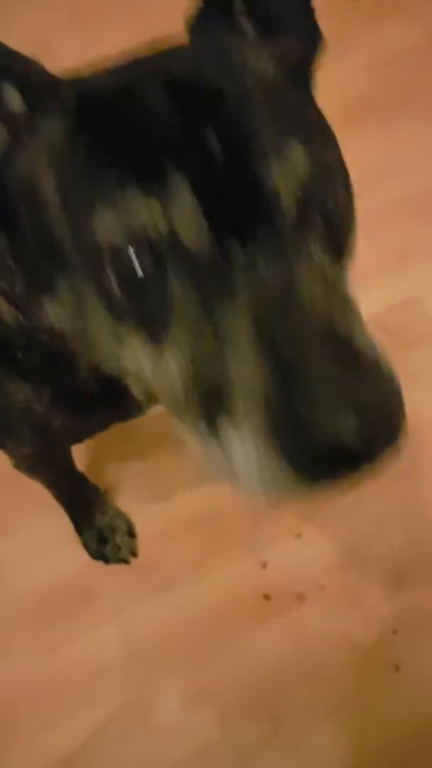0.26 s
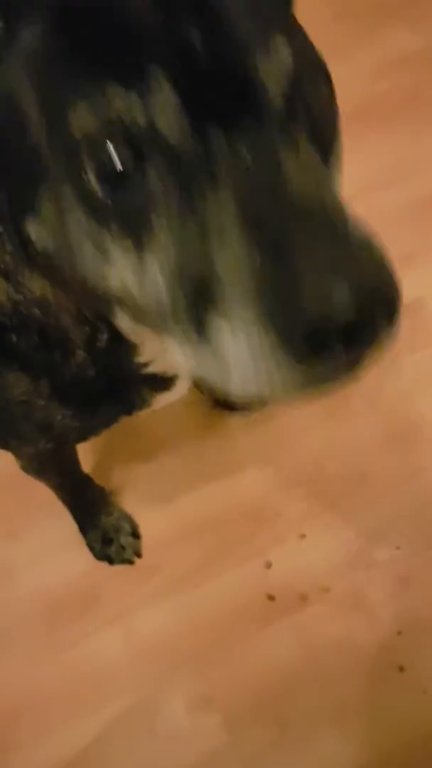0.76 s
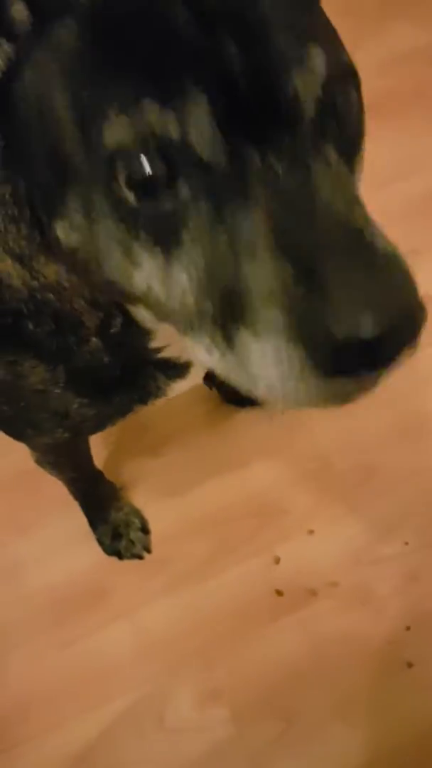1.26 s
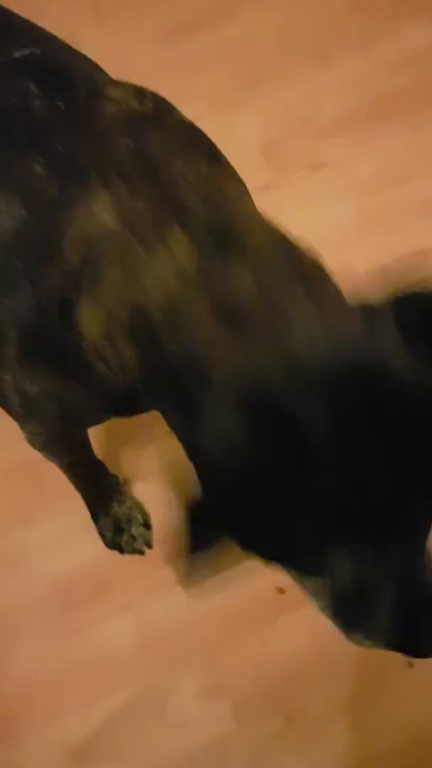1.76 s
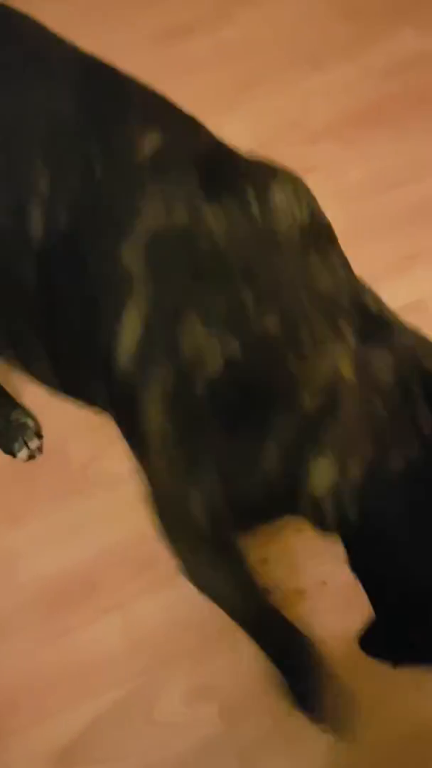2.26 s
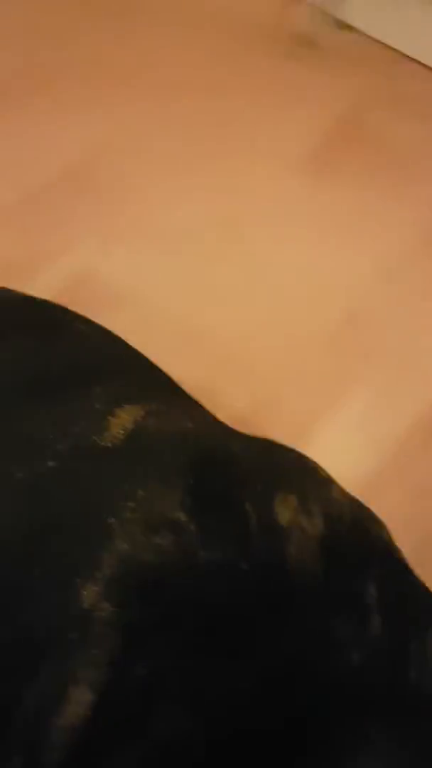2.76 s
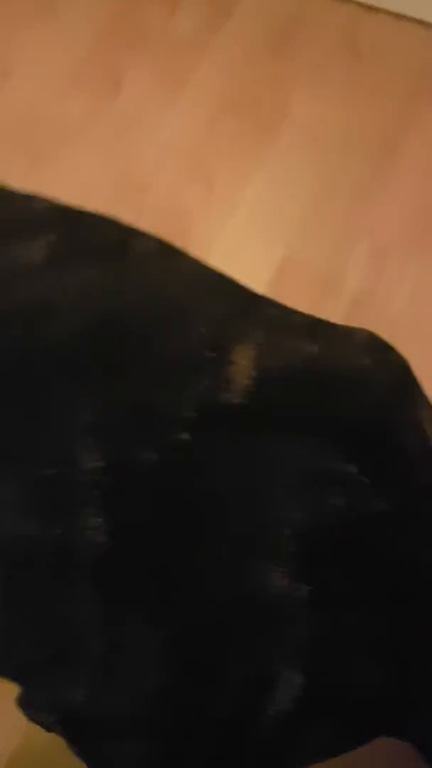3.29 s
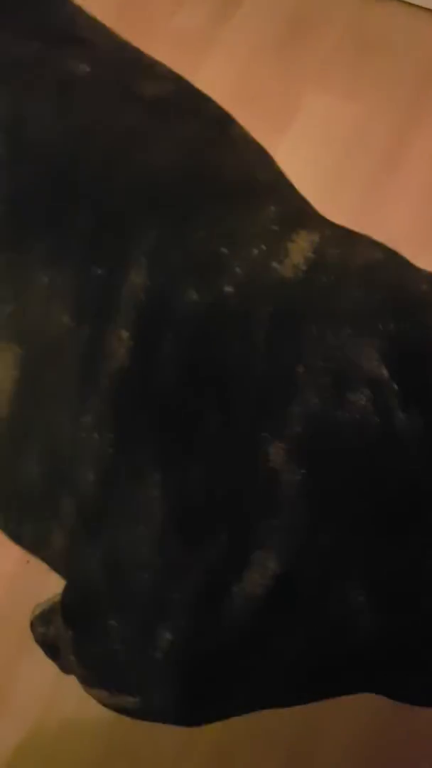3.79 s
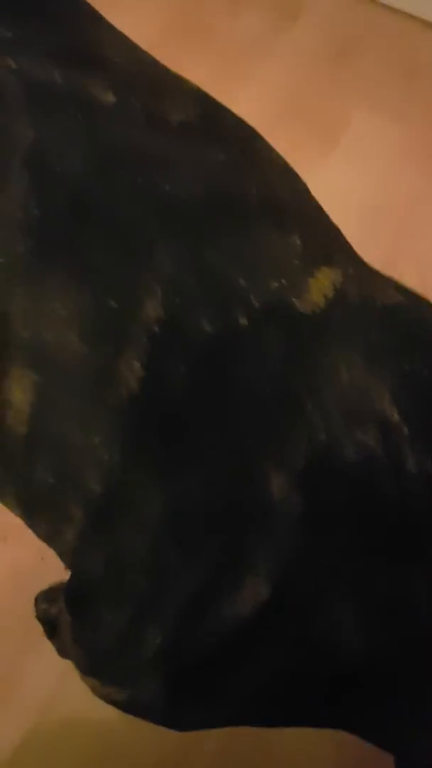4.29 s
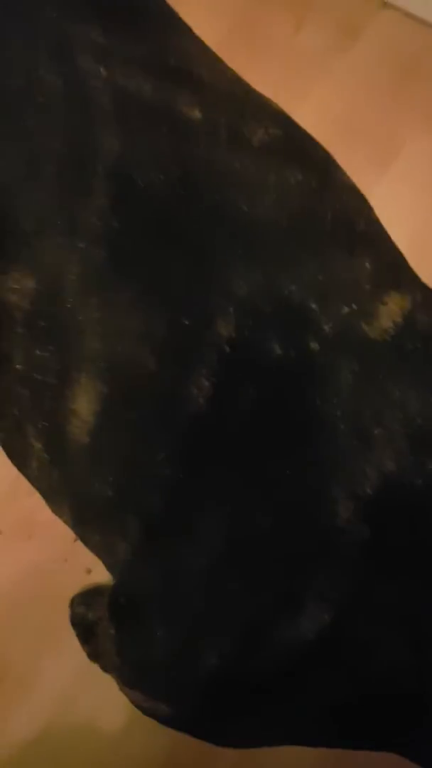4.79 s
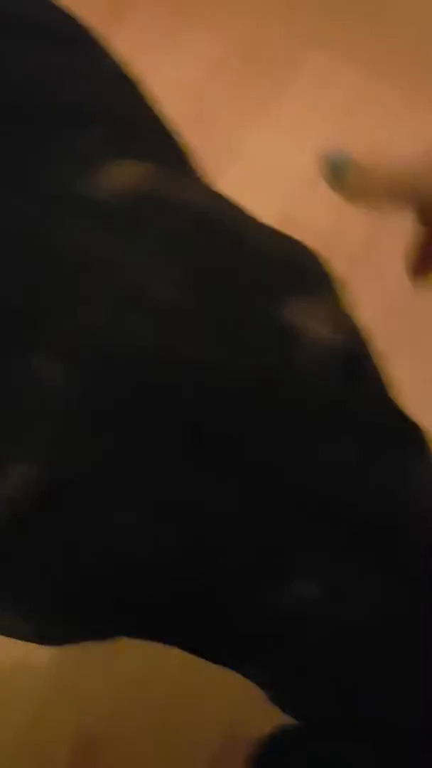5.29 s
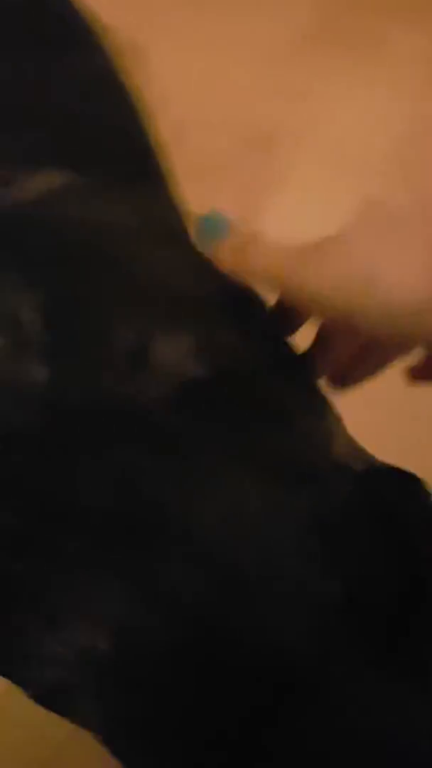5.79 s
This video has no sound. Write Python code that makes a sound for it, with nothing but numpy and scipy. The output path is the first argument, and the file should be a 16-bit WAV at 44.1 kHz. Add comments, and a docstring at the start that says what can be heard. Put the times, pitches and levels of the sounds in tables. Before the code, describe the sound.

Near silence with slight room hiss, then a dog grabs a hard biscuit: a hollow knock, followed by an explosive, bright crack. It keeps chewing with its head down, giving quieter dull knocks, small crunches and grinding, with paws shuffling on wooden boards. The sounds come in uneven bursts, with lively room echo, recorded close in stereo.

```python
"""In a bare room with a wooden floor a dog snaps up a hard biscuit, cracks it and chews while it shifts its paws.
Hollow knocks of jaw and boards are short decaying sines, ticks of tooth and claw higher ones, cracks are
showers of spiky noise through resonances, and the sharpest breaks are single pressure spikes; all ring in the room.
Shuffling and crumb rustle are uneven resonant grains over a faint hum and hiss of filtered noise;
two microphone ports hear the dog a little apart."""
import sys
import numpy as np
from scipy import signal
from scipy.fft import rfft, irfft, next_fast_len
from scipy.io import wavfile

SR = 44100
rng = np.random.default_rng(int(sys.argv[2]) if len(sys.argv) > 2 else 0)


def gain_from_db(level_db):
    """Turn a decibel level (scalar or array-like) into a linear amplitude factor."""
    decades = np.asarray(level_db, float) / 20
    return 10 ** decades


def unload_wav(signal):
    """Save mono or channel-first audio to the path in sys.argv[1] as 16-bit WAV at rate SR, clipped to [-1, 1]."""
    wavfile.write(
        sys.argv[1],
        SR,
        np.round(np.clip(np.atleast_2d(signal).T, -1, 1) * 32767).astype(np.int16),
    )


N = 266805

# slow shuffling and grinding, before layer gains: start_s, drag_db, rustle_db
GRINDING = [(1.499, -72, -88), (1.83, -78, -74), (2.0, -46, -58), (2.301, -53, -62), (2.49, -61.5, -64.5),
            (2.55, -61, -51.5), (2.69, -65.5, -66.5), (2.85, -58.5, -66), (2.999, -70, -74),
            (3.05, -63, -55), (3.12, -66, -65), (3.209, -54, -57.5), (3.45, -73, -82), (3.72, -74.5, -68),
            (3.86, -65.5, -74), (4.1, -68.5, -75), (4.36, -47, -50), (4.55, -54, -59), (4.76, -59, -64.5),
            (5.07, -70.5, -73), (5.25, -55, -62), (5.4, -62.5, -63), (6.05, -63, -68.5)]


def unit(x):
    """Scaled to rms 1."""
    return x / np.sqrt(np.mean(x ** 2) + 1e-20)


def along(points, hz):
    """(Hz, value) points interpolated on a log frequency axis."""
    point_hz, value = np.transpose(points)
    return np.interp(np.log(hz + 1), np.log(point_hz + 1), value)


def filtered(x, response):
    """x times a complex response of frequency."""
    size = next_fast_len(x.shape[-1] + 8192)
    spectrum = rfft(x, size) * response(np.fft.rfftfreq(size, 1 / SR))
    return irfft(spectrum, size)[..., :x.shape[-1]]


def resonant(x, modes):
    """x through causal resonances of alternating sign, applied twice for steep flanks."""
    def bank(f):
        total = 0
        for k, (center_hz, width_hz, gain_db) in enumerate(modes):
            band = 1j * f * width_hz / (center_hz ** 2 - f * f + 1j * f * width_hz)
            total = total + gain_from_db(gain_db / 2) * band * (-1) ** k
        return total
    return filtered(x, lambda f: bank(f) ** 2)


def diffuse(pair):
    """Two unrelated signals mixed so that the ports agree most in the bass."""
    # diffuse sound at the two ports: freq_hz, left_right_correlation
    likeness = [(60, 0.48), (180, 0.87), (550, 0.44), (1650, -0.27), (4970, 0.11), (15000, -0.27)]

    def rotation(hz):
        angle = np.arccos(np.clip(along(likeness, hz), -1, 1)) / 2
        return np.array([np.cos(angle), np.sin(angle)])
    mid, side = filtered(pair, rotation)
    return np.array([mid + side, mid - side])


def curves(rows):
    """One value per sample for each column after the time; -120 before the first row."""
    s, *columns = np.transpose(rows)
    return [np.interp(np.arange(N) / SR, s, column, left=-120) for column in columns]


def turned(s):
    """Room over direct sound, dB, as the head turns and drops away from the microphone."""
    # head position, before layer gains: time_s, room_over_direct_db
    head = [(0, -14), (1.7, -9.5), (1.84, 0.5), (1.98, 1.5), (2.15, 3), (2.7, 3.5), (3.2, -3.5), (3.4, -11),
            (3.78, -2), (4.0, -12.5), (4.25, 0.3), (4.55, 1.5), (5.1, -4), (5.4, -1.5), (5.75, -0.5),
            (5.9, -10)]
    return np.interp(s, *np.transpose(head))


def knocks():
    """Each blow rings a short hollow mode, a weaker upper one and the boards; returns direct sound and room feed."""
    # hollow blows of jaw, paw and boards, before layer gain: start_s, level_db, pitch_hz, t60_s
    blows = [(0.918, -55.5, 814, 0.029), (1.205, -41, 680, 0.027), (1.206, -46, 299, 0.042),
             (1.61, -29, 650, 0.0097), (1.635, -45, 693, 0.049), (1.659, -9.5, 329, 0.01),
             (1.663, -8, 604, 0.015), (1.683, -30.5, 490, .03), (1.706, -33, 357, 0.025),
             (1.723, -28, 294, 0.015), (1.835, -13.5, 756, 0.017), (1.84, -23, 487, 0.035),
             (1.871, -33, 665, 0.046), (1.885, -29.5, 654, 0.016), (1.957, -27, 644, 0.024),
             (1.979, -31, 652, 0.018), (2.047, -34.5, 749, 0.044), (2.052, -35, 592, 0.049),
             (2.119, -39.5, 636, 0.053), (2.277, -41.5, 644, 0.035), (2.314, -49.5, 662, 0.043),
             (2.591, -48.5, 290, 0.078), (2.705, -24.5, 677, 0.0078), (2.722, -35.5, 203, 0.033),
             (2.764, -35, 188, 0.076), (2.767, -40, 640, 0.023), (2.792, -46, 199, 0.041),
             (2.884, -56, 512, 0.037), (3.058, -55.5, 296, 0.076), (3.177, -28.5, 605, 0.022),
             (3.192, -42, 690, 0.02), (3.225, -47.5, 513, .047), (3.295, -41, 568, 0.19),
             (3.314, -35, 574, 0.072), (3.384, -41, 1000, 0.024), (3.602, -56, 810, 0.027),
             (3.622, -50.5, 942, 0.021), (3.698, -41.5, 815, .018), (3.713, -44, 486, 0.026),
             (3.743, -37.5, 590, 0.015), (3.763, -38, 576, .037), (3.776, -23.5, 549, 0.03),
             (3.79, -38, 525, 0.065), (3.804, -36, 669, 0.025), (3.861, -34, 570, 0.022),
             (4.045, -53.5, 460, 0.038), (4.13, -46, 940, .025), (4.211, -45.5, 770, 0.039),
             (4.23, -33, 517, 0.017), (4.264, -34, 810, 0.017), (4.282, -32, 880, 0.014),
             (4.356, -45, 550, 0.13), (4.484, -43, 562, 0.045), (4.496, -48.5, 544, 0.072),
             (4.551, -39, 330, 0.018), (4.619, -45, 343, 0.039), (4.649, -45.5, 395, 0.024),
             (4.737, -54, 560, 0.04), (5.12, -33.5, 924, 0.012), (5.166, -42.5, 775, 0.043),
             (5.22, -38, 740, 0.03), (5.25, -44, 655, 0.034), (5.392, -41.5, 638, 0.03),
             (5.433, -39, 840, 0.016), (5.706, -38.5, 904, 0.031), (5.747, -29, 629, 0.021),
             (5.765, -34.5, 248, .02), (5.783, -29.5, 739, 0.023), (5.894, -40.5, 608, 0.042),
             (6.025, -46.5, 300, 0.014)]
    # floor and skull under every blow, before body_db: pitch_hz, level_db, t60_s
    board_modes = [(215, -9.5, 0.052), (295.3, -4.5, 0.037), (415, 0, 0.033)]
    body_db, contact_s = -12.5, 0.0019
    out, t = np.zeros((2, N + SR)), np.arange(SR // 5) / SR
    body = 0
    for hz, level_db, t60 in board_modes:
        body = body + np.sin(2 * np.pi * hz * t) * gain_from_db(body_db + level_db - 60 * t / t60)
    draws = rng.standard_normal((len(blows), 2))
    for (s, db, hz, t60), (pitch_draw, level_draw) in zip(blows, draws):
        t60 = np.clip(t60, .006, .15)
        ring = np.sin(2 * np.pi * hz * t) * gain_from_db(-60 * (t / t60) ** 1.168)  # flesh damps it ever faster
        upper_hz = hz * (1.532 + 0.12 * pitch_draw)
        upper = np.sin(2 * np.pi * upper_hz * t) * gain_from_db(-3.5 + 2 * level_draw - 90 * t / t60)
        blow = (ring + upper + body) * (1 - np.exp(-t / contact_s))  # soft contact
        out[:, round(s * SR):][:, :len(t)] -= gain_from_db([[db + 5.0], [db + 0.35 + turned(s)]]) * blow
    # a small source radiates no deep bass
    return filtered(out[:, :N], lambda f: (1j * f / (1j * f + 150)) ** 4)


def crumbs(count=220):
    """Small fractures at random moments, their level following the grinding; rows like the cracks."""
    over_rustle_db, spread_db, bright_db, time_scale_ms = 3, 3, -10, 1.9
    when, size, tone = rng.random((count, 3)).T
    knots, _, rustle_db = np.transpose(GRINDING)
    s = knots[0] + when * (knots[-1] - knots[0])
    db = np.interp(s, knots, rustle_db) + over_rustle_db - spread_db * np.log(0.089 + size)
    return np.transpose([s, db, bright_db + 16 * (tone - .5), 0 * s + time_scale_ms])


def cracks():
    """A quick shower of splinters swells and dies in three sets of resonances; returns left, right and room feed."""
    # biscuit, tooth and claw, before layer gains: start_s, click_db, fizz_over_click_db, time_scale_ms
    breaks = [(1.2042, -56.5, -10.5, 4), (1.5429, -55.5, -8, 1.9), (1.566, -58, 1.5, 5),
              (1.5964, -66, 7, 2.8), (1.6107, -36.5, -7, 0.32), (1.6344, -48.5, 9, 1.4),
              (1.6606, -29.5, -6, 1.4), (1.836, -15, -14, 1.3), (1.8404, -14.5, -5, 1.4),
              (1.8434, -30, -9, 0.99), (1.8494, -19, -2.5, 3.3), (1.957, -28, -11, 2.3),
              (1.9814, -23.5, -18, 1.1), (2.0457, -29.5, -49, 1.5), (2.0524, -35, -14.5, 2.9),
              (2.1176, -35, -35, 1.9), (2.1563, -40.5, -22, 1.9), (2.2014, -38, -2.5, 1.3),
              (2.2214, -46.5, -10, 2.7), (2.2771, -45.5, -17, 2.1), (2.5017, -51.5, -4, 3.1),
              (2.5227, -42.5, -5.5, 2.5), (2.5394, -47.5, 0.5, 2.1), (2.7656, -40.5, -35, 1.1),
              (2.8114, -50, -9, 1.1), (2.9524, -71, 8, 1.5), (3.028, -49, -12, 3.2),
              (3.0629, -38.5, -46, 1.5), (3.1762, -39.5, -7, 2.5), (3.2286, -37.5, -38, 1.9),
              (3.2924, -28.5, -25, 2.3), (3.2959, -37.5, -9, 4.1), (3.3126, -26, -25, 1.9),
              (3.3854, -48.5, -7, 2.3), (3.6975, -45.5, -38, 1.8), (3.711, -40, -26, 0.96),
              (3.7793, -35.5, -29, 1.5), (3.7923, -43.5, -10.5, 2.5), (3.8626, -48.5, -23, 2.1),
              (3.928, -48.5, -16, 2.7), (4.0073, -56, -7.5, 1.3), (4.1315, -43, -32, 1.05),
              (4.2103, -34.5, -26.5, 1.8), (4.2408, -32.5, -19, 3.7), (4.2657, -35.5, -19, 3.9),
              (4.2827, -34, -21, 2.4), (4.3176, -56, -25, 2.15), (4.338, -36, -22, 4.7),
              (4.359, -32.5, -1.5, 2.8), (4.3764, -66, 6, 2.1), (4.5985, -32.5, -36, 2.2),
              (4.6902, -43.5, -26, 2.9), (4.737, -48, -31, 2.1), (5.0135, -36.5, -29.5, 5.8),
              (5.1233, -39, -29, 1.5), (5.1701, -37, -27, 4.2), (5.2235, -38.5, -30, 3.7),
              (5.2535, -38, -26, 2.6), (5.3941, -44.5, -22, 1.6), (5.5154, -48, -30, 1.4),
              (5.5924, -61, -5, 1.6), (5.6764, -46, -14, 4.1), (5.7054, -36.5, -29, 3.3),
              (5.7292, -63, -8, 1.6), (5.7503, -30.5, -22.5, 3.3), (5.7824, -43, -17, 2.7),
              (5.7907, -33, -17.5, 2.1), (5.8124, -40, -21, 1.9), (5.8344, -47, -15, 2.1),
              (5.8725, -51, -13, 1.9), (5.8944, -44, -28, 1.8)]
    # mouth and biscuit: center_hz, width_hz, gain_db
    click_modes = [(1500, 2070, 9.5), (2380, 1520, 10)]
    # thin shards: center_hz, width_hz, gain_db
    crisp_modes = [(2924, 1200, 9), (4384, 1180, 4.5)]
    # finest splinters: center_hz, width_hz, gain_db
    fizz_modes = [(5130, 2970, -0.5), (8220, 2700, 3), (12360, 5260, -8)]
    out, t = np.zeros((3, N + SR)), np.arange(SR // 20) / SR
    s, click_db, bright_db, ms = np.vstack([breaks, crumbs()]).T[..., None]
    crisp_db = click_db - 4.5 + 0.41 * bright_db  # shards partly follow the splinters
    fizz_db = click_db + bright_db
    size = (len(s), 3, len(t))
    spiky = rng.standard_normal(size) * rng.exponential(size=size) ** 1.77
    shared, left, right = np.swapaxes(spiky, 0, 1)
    impulse = 0 * shared + (t == 0)  # the walls get an even spectrum
    bursts = np.array([shared + 1.6 * left, shared + 1.9 * right, impulse])
    u = 1000 * t / np.clip(ms, .1, 8)
    layers = ((click_modes, click_db + 13.5, 1.2), (crisp_modes, crisp_db + 21.0, 1.4),
              (fizz_modes, fizz_db + 19.0, 1.9))
    sound = 0
    for modes, db, haste in layers:  # finer splinters are over sooner
        rung = resonant(bursts * (haste * u + 0.11) * np.exp(-haste * u), modes)
        sound = sound + gain_from_db(db) * rung / np.linalg.norm(rung, axis=2, keepdims=True)
    sound[2] *= gain_from_db(turned(s))
    for start, crack in zip(s[:, 0], np.swapaxes(sound, 0, 1)):
        out[:, round(start * SR):][:, :len(t)] += crack
    return out[:, :N] * gain_from_db([[.7], [-.7], [0]])


def ticks():
    """One hard contact, one high mode dying fast."""
    # tooth and claw, before layer gain: start_s, level_db, pitch_hz, t60_s
    contacts = [(1.662, -16.5, 2110, 0.02), (1.663, -23.5, 1060, 0.013), (1.8435, -9.5, 2824, 0.015),
                (1.849, -13.5, 3465, 0.013), (1.957, -34, 1180, 0.018), (1.98, -23, 1200, 0.026),
                (2.117, -35, 1280, 0.03), (2.7675, -34.5, 990, 0.014), (3.027, -45, 1957, 0.044),
                (3.04, -40.5, 1750, 0.04), (3.0619, -26.5, 1520, 0.0097), (3.2288, -39.5, 1620, 0.023),
                (3.697, -42, 1790, 0.018), (3.709, -39, 1495, 0.011), (3.78, -57, 1790, 0.013),
                (3.793, -50, 1720, 0.016), (3.8643, -37, 1470, 0.019), (3.928, -53, 1440, 0.017),
                (4.0056, -32, 1500, 0.011), (4.135, -42, 1365, 0.042), (4.211, -38, 1380, 0.027),
                (4.241, -31, 1980, 0.02), (4.2642, -28, 1120, 0.011), (4.5994, -29.5, 2780, 0.018),
                (4.5987, -33.5, 1434, 0.065), (4.634, -41.5, 1444, 0.054), (5.014, -38, 1161, 0.075),
                (5.016, -36, 1776, 0.053), (5.0836, -43, 1300, 0.023), (5.123, -51, 1110, 0.016),
                (5.1688, -36, 1000, 0.036), (5.225, -38, 1160, 0.031), (5.705, -32.5, 2920, 0.016),
                (5.75, -36.5, 1700, 0.029), (5.789, -40, 1680, 0.02), (5.8113, -51, 1750, 0.02)]
    out, t = np.zeros(N + SR), np.arange(SR // 10) / SR
    for s, db, hz, t60 in contacts:
        ring = np.sin(2 * np.pi * hz * t) * gain_from_db(-60 * t / np.clip(t60, .003, .08))
        out[round(s * SR):][:len(t)] -= gain_from_db(db - 3.0) * ring * (1 - np.exp(-t / 0.00028))
    return out[:N]


def snaps():
    """A sudden break: a sharp drop in pressure and a slower rebound."""
    # sharpest breaks, before layer gains: start_s, level_db, time_scale_ms, left_over_right_db
    spikes = [(1.661, -21, 0.17, -6), (1.836, -7.5, 0.096, -18), (1.838, -8.5, 0.22, -4),
              (1.84, -11, 0.16, -6.5), (1.843, 2.5, 0.037, 11), (1.848, -17, 0.12, 7),
              (1.852, -16.5, 0.09, -8), (1.958, -19.5, 0.13, -2), (1.982, -19, 0.14, -1.5),
              (3.062, -33.5, 0.088, -9), (3.176, -20.5, 0.21, 2), (3.297, -16.5, 0.16, 3),
              (4.007, -40.5, 0.2, -8), (4.36, -48, 0.067, 4), (5.751, -27, 0.26, -6)]
    out, t = np.zeros((2, N + SR)), np.arange(SR // 100) / SR
    for s, db, ms, pan_db in spikes:
        u = 1000 * t / np.clip(ms, .03, .6)
        spike = (u / 2 - 1) * u * np.exp(-u)
        gain = gain_from_db([[db + 8.5 + pan_db / 2], [db + 6.5 - pan_db / 2]])
        out[:, round(s * SR):][:, :len(t)] += gain * spike

    def response(f):
        no_deep_bass = (1j * f / (1j * f + 250)) ** 2  # small source
        return no_deep_bass / (1 + 1j * f / 9000)  # the microphone rolls off the top
    return filtered(out[:, :N], response)


def weight():
    """Each step loads the boards quickly and lets go at its own speed: level in dB."""
    # the dog's weight lands, before layer gain: peak_s, thud_db, fall_db_per_s
    steps = [(1.66, -60.5, 120), (1.84, -57, 450), (1.98, -67, 108), (2.25, -60, 202), (2.49, -66, 200),
             (2.61, -57, 150), (2.77, -51.5, 125), (3.05, -64, 110), (3.62, -65, 246.5), (3.77, -67.5, 72),
             (4.12, -76, 305), (4.25, -68.5, 22), (5.19, -73.5, 62), (5.76, -60, 110), (6.0, -62.5, 250)]
    rise_db_per_s = 250.5
    s, db, fall = np.transpose(steps)[..., None]
    t = np.arange(N) / SR - s
    return (db - np.where(t < 0, -rise_db_per_s * t, fall * t)).max(0)


def shuffle():
    """Weight on the boards is resonant noise; dragging pads and grinding crumbs are uneven resonant grains."""
    # boards under the weight: center_hz, width_hz, gain_db
    thud_modes = [(62, 74, -19.5), (107, 60, -13)]
    # pads on wood: center_hz, width_hz, gain_db
    drag_modes = [(322.4, 334, 5.5), (638, 1290, 8.5), (1286, 2480, -1)]
    # crumbs: center_hz, width_hz, gain_db
    rustle_modes = [(2496, 370, 2.5), (3830, 1140, -1.5), (8500, 2300, -14.5), (13600, 7800, -5)]

    def grains(spiky):
        return rng.standard_normal((2, N)) * rng.exponential(size=(2, N)) ** spiky
    drag_db, rustle_db = curves(GRINDING)
    rumble = rng.standard_normal(N) + 0.49 * rng.standard_normal((2, N))  # mostly shared by the ports
    thud = unit(resonant(rumble, thud_modes)) * gain_from_db(weight() - 4.0)
    drag = unit(resonant(diffuse(grains(spiky=2.8)), drag_modes)) * gain_from_db(drag_db - 2.0)
    rustle = unit(resonant(grains(spiky=1.45), rustle_modes)) * gain_from_db(rustle_db - 10.0)
    return thud + drag + rustle


def room(x):
    """Each frequency dies at its own speed; every quarter second the moving dog excites another tail."""
    # reverberation: freq_hz, t60_s
    decay = [(150, 0.47), (600, 0.52), (2000, 0.44), (5000, 0.45), (9000, 0.4), (10500, 0.26),
             (16000, 0.18)]
    out, step = np.zeros((2, N + 2 * SR)), SR // 4
    sparse = 1.3 * np.exp(-np.arange(3 * step) / SR / 0.05)  # early echoes come singly, later ones merge
    for start in range(0, N, step):
        echoes = rng.standard_normal((2, 3 * step)) * rng.exponential(size=(2, 3 * step)) ** sparse
        hz, t, z = signal.stft(echoes, SR, nperseg=256)
        fading = z * gain_from_db(-60 * t / along(decay, hz)[:, None])
        tail = signal.istft(fading, SR, nperseg=256)[1]
        tail /= np.linalg.norm(tail, axis=1, keepdims=True)
        wet = signal.fftconvolve(x[None, start:start + step], tail, axes=1)
        out[:, start + 130:][:, :wet.shape[1]] += wet  # first walls answer after 3 ms
    return diffuse(out[:, :N])


def floor():
    """Steady hiss, the microphone's treble noise and a few narrow, wavering hum bands."""
    # quiet room and microphone, spectrum shape: freq_hz, relative_db
    hiss_shape = [(13, -30), (22, -20), (59, -16.5), (132, -10), (263, -11), (294, -8.5), (387, -10.5),
                  (554, -6), (618, -11.5), (672, -10.5), (988, -12), (1490, -15.5), (2140, -16),
                  (5770, -30), (16000, -34)]
    # the microphone's own treble resonance: center_hz, width_hz, gain_db
    port_modes = [(13400, 6900, 0)]
    # a distant appliance: center_hz, width_hz, rms_db
    hum_bands = [(125, 17, -80), (288, 53, -82), (548, 7.9, -75.5)]
    hiss = unit(diffuse(filtered(rng.standard_normal((2, N)), lambda hz: gain_from_db(along(hiss_shape, hz)))))
    treble = unit(resonant(rng.standard_normal((2, N)), port_modes))
    hum = 0
    for hz, width_hz, db in hum_bands:
        hum = hum + gain_from_db(db) * unit(resonant(rng.standard_normal(N), [(hz, width_hz, 0)]))
    return gain_from_db(-66.5) * hiss + gain_from_db(-81.5) * treble + hum


def scene():
    """The dog heard directly, later at the left port, then through the room."""
    lag_samples = 10  # the left port is farther from the dog
    hollow, hollow_wet = knocks()
    *brittle, brittle_wet = cracks()
    hard, sharp = ticks(), snaps()
    near = hollow + hard + np.array(brittle) + sharp
    near[0] = np.pad(near[0], (lag_samples, 0))[:N]
    hard_wet = gain_from_db(-4.5 + turned(np.arange(N) / SR)) * hard
    sharp_wet = gain_from_db(-1) * sharp.mean(0)
    return near + room(hollow_wet + brittle_wet + hard_wet + sharp_wet) + shuffle() + floor()


def top_cut(x):
    """Nothing passes above the cut-off."""
    return signal.sosfilt(signal.butter(12, 16530, fs=SR, output="sos"), x)


def record(dry):
    """The recorder rounds off the highest peaks, keeps nothing above its band limit and sits slightly off zero."""
    ceiling, top_hz, offset = .95, 16000, -.0005
    soft = dry / (1 + np.abs(dry / ceiling) ** 6) ** (1 / 6)
    mix = filtered(soft, lambda hz: hz < top_hz) + offset
    return top_cut(mix)


dry = scene()
out = record(dry)
unload_wav(out)
```